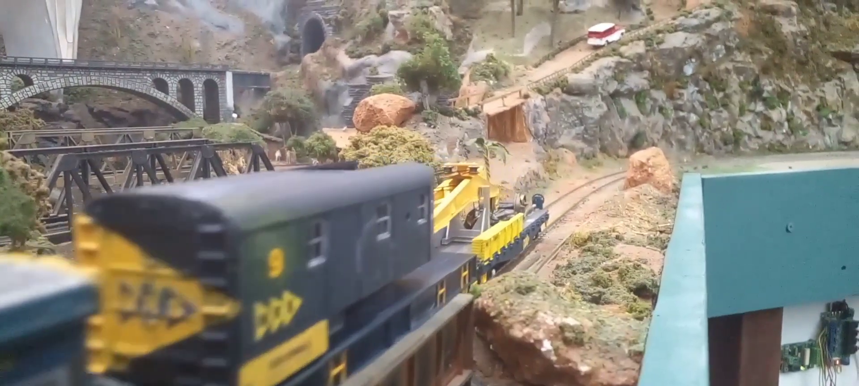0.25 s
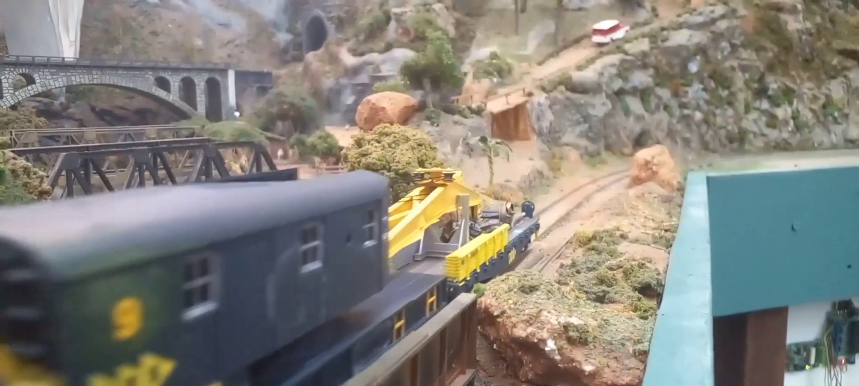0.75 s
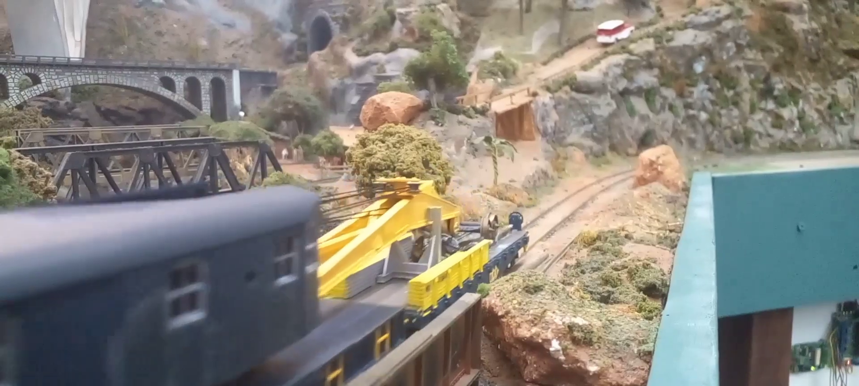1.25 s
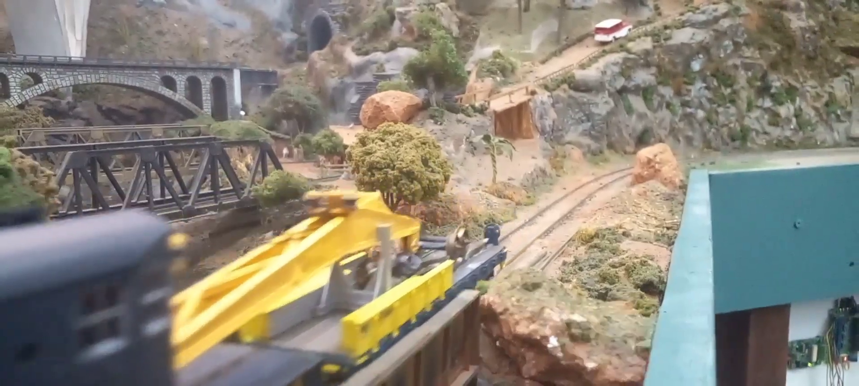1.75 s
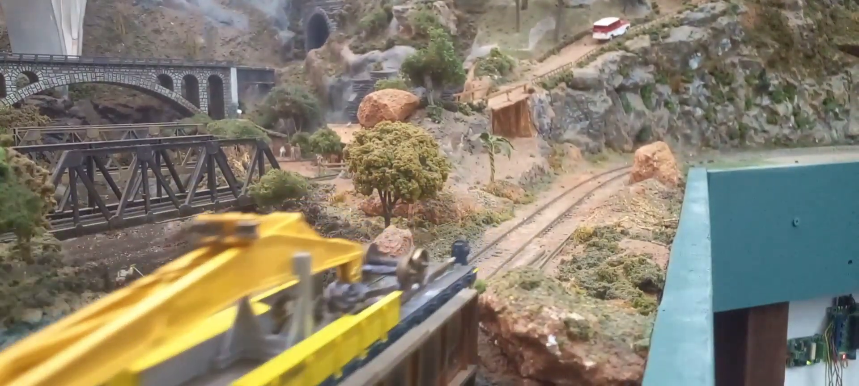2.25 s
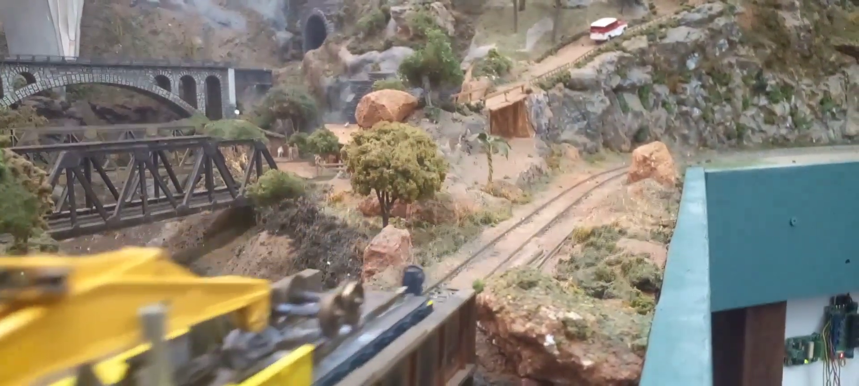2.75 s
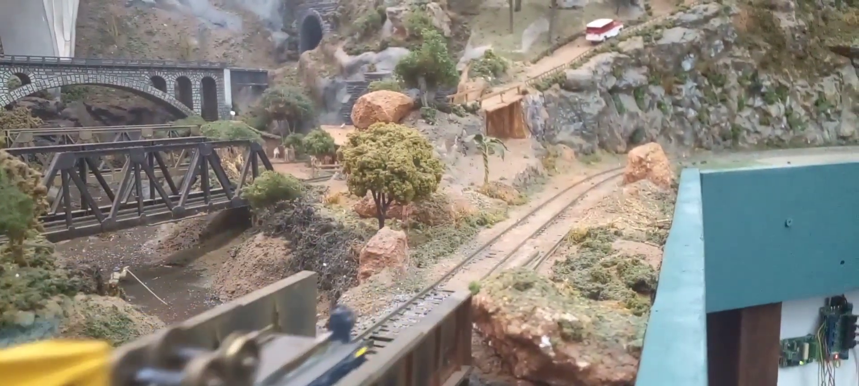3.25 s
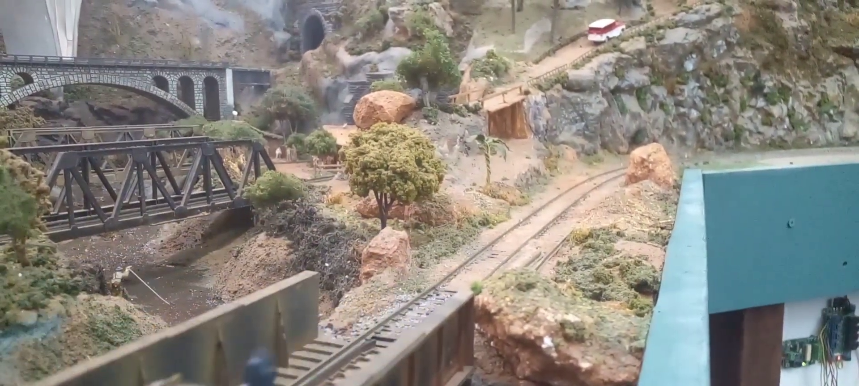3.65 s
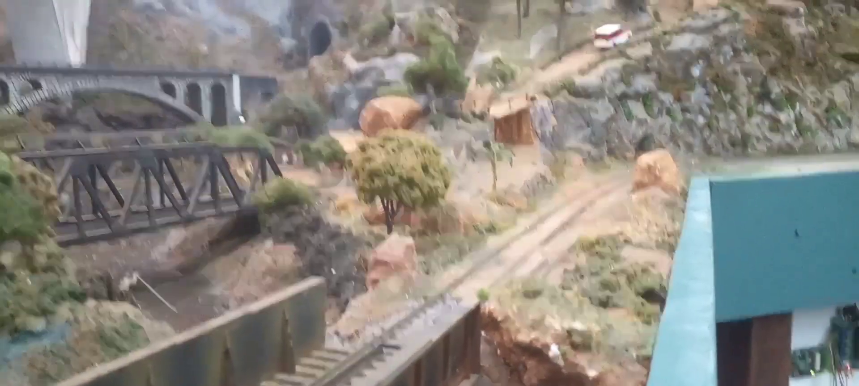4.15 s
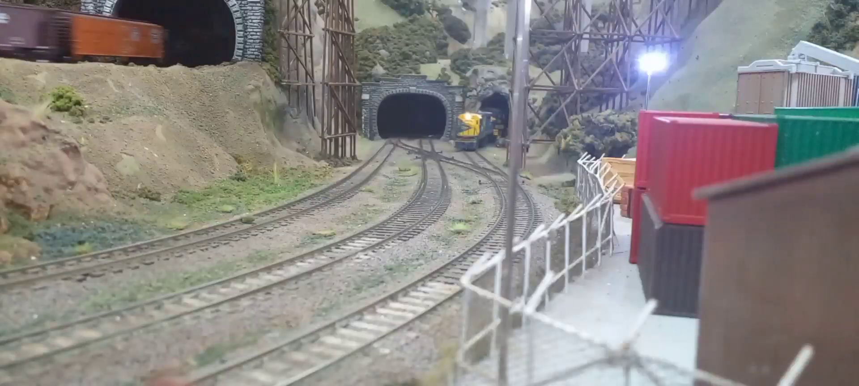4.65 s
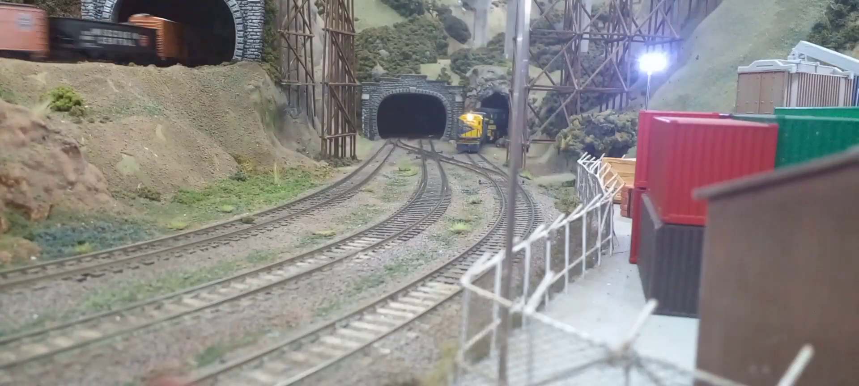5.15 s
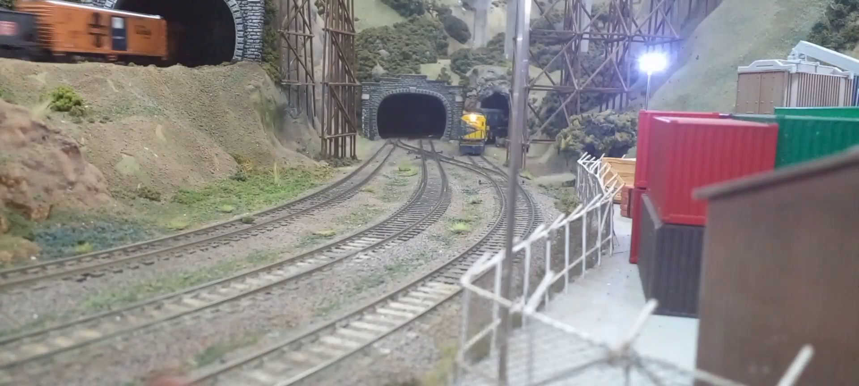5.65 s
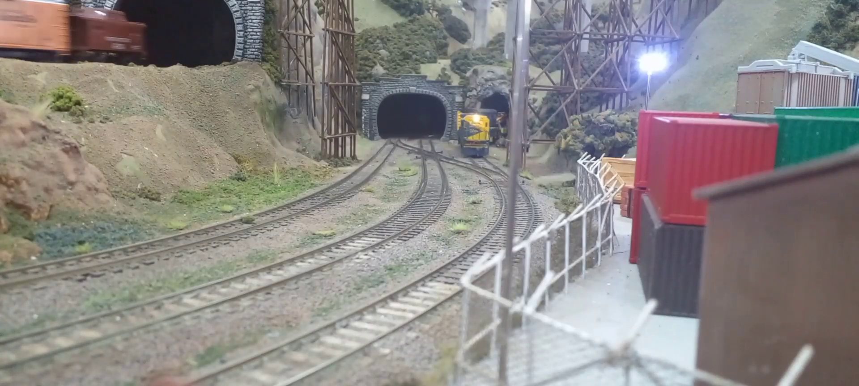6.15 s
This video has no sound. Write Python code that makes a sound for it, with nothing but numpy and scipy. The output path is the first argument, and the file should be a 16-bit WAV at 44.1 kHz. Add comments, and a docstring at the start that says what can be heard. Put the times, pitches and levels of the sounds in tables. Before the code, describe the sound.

Close mono pickup in a small, fairly dry room: tiny wheels hiss and tick on rails above a buzzing electric motor hum and faint mains hum. Clicks begin modest, then turn sharper and sparser while the motor fades. The sound cuts out briefly, then returns abruptly as a fuller, brighter rush of rolling wheels, crowded with muffled clacks, to the end.

```python
"""Motor hum, wheel hiss and clicking wheels of a small electric train drawing away over an indoor bridge;
a short silence; then, close beside a curve, louder rolling with crowded, mostly duller clicks and no motor.
Rolling is shaped noise, motor and mains are wavering sines, clicks are short strikes ringing resonances.
Clicks and knocks leave a short room tail. One mono microphone, the same signal on both channels."""
import sys
import numpy as np
from scipy import signal
from scipy.fft import rfft, irfft, next_fast_len
from scipy.io import wavfile
from scipy.ndimage import uniform_filter1d, map_coordinates

SR = 44100
rng = np.random.default_rng(int(sys.argv[2]) if len(sys.argv) > 2 else 0)


def dump_mix(stems):
    """Bounce the given channels to the path in sys.argv[1] as a 16-bit WAV at rate SR."""
    frames = np.atleast_2d(stems).T  # one column per channel
    limited = np.clip(frames, -1, 1)  # hard clip at full scale
    pcm = np.round(limited * 32767).astype(np.int16)
    wavfile.write(sys.argv[1], SR, pcm)


def ratio(d):
    """dB to gain"""
    e = np.asarray(d, float) / 20
    return 10 ** e


N = 282240

# mains hum: (frequency [Hz], mean level at the bridge [dB rms], mean level at the curve [dB rms])
MAINS_HUM = (59, -56.5, -54)
# spectra of the rolling layers, a list for the bridge and one for the curve:
# (frequency [Hz], relative density [dB per Hz])
RUMBLE_SPECTRA = ([(76, -43.5), (130, -14.5), (210, -3.5), (242, -2.5), (274, -3.5), (349, -5), (425, -8),
                   (452, -10.5), (700, -17), (910, -48.5), (1540, -120)], [(76, -27), (130, 1.5),
                   (200, -3.5), (280, 1.5), (346, 0), (386, -8), (600, -7.5), (780, -34), (1320, -120)])
HISS_SPECTRA = ([(290, -50), (500, -13.5), (589, -4.5), (636, -10.5), (677, -7), (1100, -10), (1170, -8),
                 (1480, -2.5), (2070, -6), (2310, -3), (3200, -18), (4160, -37.5), (7040, -120)],
                 [(240, -23), (400, -12.5), (538, -7.5), (634, -4), (802, -7.5), (963, -3.5), (1200, -5.5),
                 (1970, 0), (3200, -5), (4160, -25), (7040, -120)])
FIZZ_SPECTRA = ([(1650, -28.5), (2800, -8), (3040, -8), (3510, -4.5), (3860, -4.5), (4490, -10), (5110, -9),
                 (5530, -9.5), (6510, -11.5), (7410, -22.5), (7600, -31.5), (9880, -56), (16700, -120)],
                 [(1650, -15.5), (2800, -7), (3200, -1), (3880, -2.5), (4400, -3), (4860, -7.5),
                 (6320, -13), (7600, -31.5), (9880, -64), (16700, -120)])
SHEEN_SPECTRA = ([(4470, -38.5), (7600, -11), (9040, -7), (9780, -6), (11300, -3), (13200, 0.5),
                  (15700, -2)], [(4470, -35), (7600, -18), (8250, -6.5), (10700, 1.5), (13400, -0.5),
                  (15100, -1), (15700, -4)])
# deep thrum of the layout's frame, both places: (frequency [Hz], relative density [dB per Hz])
THRUM_SPECTRUM = [(15, -52.5), (25, -12), (36, -13), (49, -8), (102, 3.5), (126, -1), (150, -10),
                  (200, -35), (330, -120)]
# base levels at the bridge, then at the curve: (thrum [dB], rumble [dB], hiss [dB], fizz [dB], sheen [dB])
LAYER_LEVELS = ((-52, -49, -47, -56, -61.5), (-46, -44, -31.5, -36.5, -57))
# load at each place: (time [s], weight on the frame [dB], wheel rolling [dB]), relative to the base levels
BRIDGE_MOTION = [(0, 3, 0.5), (.2, 2, -1.5), (.55, 2, -0.5), (.7, 7, 0.5), (.95, 5, 1), (1.2, -1, -1.5),
                 (1.5, 1, 1), (1.85, -3, 0.5), (2.1, -4.5, 1), (2.55, -6, 0), (2.72, -4, 3),
                 (2.9, -6.5, -1), (3.3, -4, 1), (3.45, 0, 0.5), (3.7, -8.5, 0), (4.05, 4, 0.5),
                 (4.28, -2, 0)]
CURVE_MOTION = [(4.44, 3, -0.5), (4.6, 2, 0), (5.2, 3, 0.6), (5.75, -0.5, 0), (5.84, -9, 1), (6.05, 0, 0),
                (6.4, -3, 0.3)]
# flange scraping the rail: (time [s], swell [dB], half-length to 1/e of the swell [s])
FLANGE_SCRAPES = [(0.53, 5.5, 0.027), (0.884, 4, 0.023), (0.977, 4, 0.046), (2.09, 2.5, 0.023),
                  (2.9, 4.5, .04), (3.885, 2.5, 0.026)]
# motor shaft: (time [s], speed [turns per s])
SHAFT_SPEED = [(0, 32.6), (.4, 33.3), (.8, 33.9), (1.2, 34.3), (2, 34.6), (4.28, 34.4)]
# motor effort: (time [s], level change of all orders [dB])
MOTOR_EFFORT = [(0, 0), (.4, 0), (.8, -1), (1.1, 0.5), (1.8, 4), (2.2, -0.5), (2.55, -6), (3, 0),
                (3.5, -0.5), (3.9, -7.5), (4.28, -10)]
# shaft orders: (order [cycles per turn], level while near [dB], level once moved on [dB]), before effort
SHAFT_ORDERS = [(3, -64, -69.5), (4, -50.5, -57.5), (5, -61, -62.5), (6, -59.5, -62), (7, -66, -51),
                (8, -50, -68), (9, -61, -62), (10, -69, -67), (11, -66, -64.5)]
# heavy axles on the bridge: (time [s], peak level [dB], frame ring [Hz])
AXLE_THUMPS = [(0.029, -37, 105.3), (.25, -38, 99), (.67, -34, 100), (1.059, -39.5, 118), (1.17, -40, 109),
               (1.479, -41, 101), (4.04, -42, 111), (4.23, -41, 97)]
# wheel clicks on the rail, some with a rattle or bounce as a row of its own:
# (time [s], relative level [dB], loudest ring [Hz], relative brightness [dB])
RAIL_CLICKS = [(0.033, -34, 1440, -9), (0.1847, -36.5, 6500, 3), (0.292, -30.5, 3120, -9.5),
               (0.3786, -28, 3480, -9), (0.393, -26.5, 2660, -3), (0.5139, -28.5, 3060, -4),
               (0.528, -32.5, 2460, -12), (0.6729, -28.5, 1910, -5.5), (0.878, -33.5, 3600, -5),
               (0.9795, -29.5, 1920, -15), (1.3085, -21.5, 5450, 3), (1.611, -26.5, 3900, -2),
               (1.7055, -31, 3170, -10.5), (1.8584, -28.5, 1640, -1.5), (1.987, -18.5, 6530, 8.5),
               (2.0078, -21, 5440, -1.5), (2.07, -34.5, 1440, -2), (2.1746, -18, 6640, 6.5),
               (2.3657, -18.5, 6600, 4), (2.64, -34, 2090, -10), (2.832, -35.5, 3790, 7),
               (2.8404, -29, 1570, -2), (2.886, -27.5, 2050, -19), (2.929, -35.5, 1700, -12),
               (3.0155, -20, 6650, 4), (3.212, -17, 5630, 3), (3.268, -33, 2630, -3),
               (3.2792, -36, 2760, 0), (3.452, -29, 2050, -3), (3.6763, -19.5, 2450, 2.5),
               (3.8514, -17.5, 2500, -7.5), (3.8665, -25.5, 2560, -12), (3.912, -21, 7200, 0.5),
               (4.1046, -34, 1980, -11), (4.519, -23, 3960, -13), (4.598, -17.5, 4200, -14.5),
               (4.707, -22, 2520, -17), (4.785, -20, 4110, -19), (4.861, -20, 1835, -20),
               (5.051, -20, 1940, -15), (5.1513, -22.5, 3960, -12), (5.267, -22.6, 2280, -5.5),
               (5.3494, -25, 2930, -9), (5.441, -21, 3350, -15), (5.733, -21, 3360, -6),
               (5.83, -19.5, 1450, -14), (5.894, -20.5, 3600, -17), (5.914, -25, 1790, -18),
               (6.026, -21, 3170, -13), (6.12, -20, 2950, -12), (6.267, -23, 3510, -18),
               (6.356, -21, 2460, -19)]
# wheel and rail resonances: (frequency [Hz], width [Hz], gain [dB])
RAIL_MODES = [(1473, 380, -0.5), (2415, 370, 1.5), (3747, 390, 0), (4570, 600, -3), (5430, 250, 7.5),
              (6400, 870, 2)]
# baseboard resonances: (frequency [Hz], width [Hz], gain [dB])
BOARD_MODES = [(646, 163, -1), (1270, 280, 0.5)]
# treble of a click: (frequency [Hz], relative density [dB per Hz])
TICK_SPECTRUM = [(7000, -120), (7600, -8.5), (9000, 1), (11000, 7), (13500, 10), (15500, -9), (16500, -18),
                 (16600, -120)]
# clicks grow duller above 7 kHz; this gain shapes the strike that rings the rail: (frequency [Hz], gain [dB])
CLICK_DULLING = [(6900, -5.5), (7900, -13)]
# a coupling knocks on the baseboard: (time [s], relative level [dB])
COUPLING_KNOCKS = [(0.293, -40), (0.309, -33), (0.396, -32), (1.281, -44)]
# room decay: (frequency [Hz], time to fall 60 dB [s])
ROOM_DECAY = [(500, 0.22), (3000, 0.19), (10000, 0.031)]
# pause between the places: (start [s], end [s])
PAUSE = (4.2802, 4.4352)


def unit(x):
    """Scaled to rms 1."""
    return x / np.sqrt(np.mean(x ** 2) + 1e-20)


def peak(x):
    """Scaled to peak 1."""
    return x / np.abs(x).max()


def along(points, hz):
    """Values of (Hz, value) points read on a log frequency axis."""
    f, v = np.transpose(points)
    return np.interp(np.log(hz + 1), np.log(f + 1), v)


def curves(rows):
    """One value per sample for each column after the time."""
    s, *cols = np.transpose(rows)
    return [np.interp(np.arange(N) / SR, s, c) for c in cols]


def wobble(rate):
    """A smooth random curve with rate knots a second."""
    knots = rng.standard_normal(int(N * rate / SR) + 4)
    return map_coordinates(knots, [np.arange(N) * rate / SR])


def filtered(x, response):
    """The sound x through a response given as a function of frequency."""
    m = next_fast_len(len(x) + 4096)
    spectrum = rfft(x, m) * response(np.fft.rfftfreq(m, 1 / SR))
    return irfft(spectrum, m)[:len(x)]


def modes(table):
    """Causal response of a few resonances, alternating in sign."""
    def response(f):
        total = 0
        for k, (centre, width, db) in enumerate(table):
            damping = 1j * f * width
            total = total + (-1) ** k * ratio(db) * damping / (centre * centre - f * f + damping)
        return total
    return response


def rolling(spectrum, patchy_db, grit_db, grit_rate):
    """Noise of rms 1 with patches of gain, roughened by tiny wheel contacts."""
    z = signal.stft(rng.standard_normal(N), nperseg=512)[2]
    field = uniform_filter1d(rng.standard_normal(z.shape), 8, 0)  # smooth across frequency
    field = uniform_filter1d(field, 10, 1)  # and across time
    noise = signal.istft(z * ratio(patchy_db * unit(field)), nperseg=512)[1][:N]
    gritty = noise * ratio(grit_db * wobble(grit_rate))
    return unit(filtered(gritty, lambda hz: ratio(along(spectrum, hz))))


def train(load, place, flutter_db, grit_db):
    """Wheels on rails stir frame and baseboard; a shared random unsteadiness moves hiss, fizz and sheen."""
    weight_db, roll_db = curves(load)
    roll_db = roll_db + scrapes()
    thrum_db, rumble_db, hiss_db, fizz_db, sheen_db = LAYER_LEVELS[place]

    # as the locomotive draws away from the bridge, rumble and sheen sink
    leaving_s = np.arange(N) / SR * (place == 0)
    rumble_db = rumble_db + 0.05 * weight_db - 1.16 * (leaving_s - leaving_s.mean())  # sinks 1.16 dB per s
    sheen_db = sheen_db + roll_db / 2 + np.maximum(-3 * leaving_s, -6)  # 3 dB per s, by 6 dB at most
    flutter = flutter_db * (0.7 * wobble(16) + 0.67 * wobble(45))
    thrum_swell_db = (1.5, 1)[place] * wobble(8)

    thrum = rolling(THRUM_SPECTRUM, patchy_db=1.6, grit_db=1.0, grit_rate=11)
    thrum = thrum * ratio(thrum_db + weight_db + thrum_swell_db)
    rumble = rolling(RUMBLE_SPECTRA[place], patchy_db=0.3, grit_db=0.7, grit_rate=18)
    rumble = rumble * ratio(rumble_db + 1.4 * wobble(11))
    hiss = rolling(HISS_SPECTRA[place], patchy_db=0.85, grit_db=grit_db, grit_rate=320)
    hiss = hiss * ratio(hiss_db + roll_db + flutter / 2)
    fizz = rolling(FIZZ_SPECTRA[place], patchy_db=0.55, grit_db=grit_db, grit_rate=490)
    fizz = fizz * ratio(fizz_db + 0.93 * roll_db + flutter)
    sheen = rolling(SHEEN_SPECTRA[place], patchy_db=0.5, grit_db=grit_db, grit_rate=770)
    sheen = filtered(sheen * ratio(sheen_db + flutter / 2), lambda hz: hz < 15800)
    return thrum + rumble + hiss + fizz + sheen


def motor():
    """Orders of the shaft speed waver in strength and phase; their balance shifts as the locomotive moves on."""
    moves_on_s, move_length_s = 1.26, 0.4  # middle and length of the shift
    angle = 2 * np.pi * np.cumsum(curves(SHAFT_SPEED)[0]) / SR
    moved = np.clip((np.arange(N) / SR - moves_on_s) / move_length_s + 0.5, 0, 1)
    hum = np.zeros(N)
    for order, near_db, far_db in SHAFT_ORDERS:
        level_db = near_db + (far_db - near_db) * moved + 2.3 * wobble(9)
        hum += ratio(level_db) * np.sin(np.round(order) * angle + 0.5 * wobble(9))
    return np.sqrt(2) * ratio(curves(MOTOR_EFFORT)[0]) * hum


def mains(db):
    """The supply's hum, a sine slightly unsteady in level and phase."""
    phase = 2 * np.pi * MAINS_HUM[0] * np.arange(N) / SR + 0.5 * wobble(5)
    return np.sqrt(2) * ratio(db + 2.2 * wobble(5)) * np.sin(phase)


def thumps():
    """Heavy axles push the bridge softly and ring its frame briefly."""
    rise_s, t60_s = 0.012, 0.22
    out, t = np.zeros(N + SR), np.arange(SR // 3) / SR
    envelope = (1 - np.exp(-t / rise_s)) * ratio(-60 * t / t60_s)
    for s, db, hz in AXLE_THUMPS:
        out[round(s * SR):][:len(t)] += ratio(db) * peak(envelope * np.sin(2 * np.pi * hz * t))
    return out[:N]


def all_clicks(faint_count):
    """Every click, in the columns of RAIL_CLICKS: the listed ones, a bounce after each and faint ones."""
    def chance_ring(u):
        """One of the three lowest rail modes, detuned by up to 15 percent."""
        return RAIL_MODES[int(u * 3)][0] * (1 + 0.3 * (u * 3 % 1 - 0.5))

    bounces = []
    for s, db, hz, bright_db in RAIL_CLICKS:
        u, v = rng.random(2)
        later_s = 0.0087 * (1 + 0.2 * (2 * u - 1))
        # a low ring is kept; after a high one chance picks the mode
        ring = hz if hz < 3000 else chance_ring(v)
        bounces.append((s + later_s, db - 9.5, ring, bright_db - 7))  # weaker and duller
    # faint clicks at chance moments before the pause
    faint = [(u * PAUSE[0], -39.5 + 4 * (v - 0.5), chance_ring(w), -6)
             for u, v, w in rng.random((faint_count, 3))]
    return list(RAIL_CLICKS) + bounces + faint


def rattle(t, length):
    """A burst of noise with a very fast rise and a decay of about length seconds."""
    decay = np.exp(-(t / max(length, 0.0005)) ** 1.23)
    return rng.standard_normal(len(t)) * decay * (1 - np.exp(-t / 0.0001))


def wheel_clicks():
    """Each click is a strike and a rattle of a few ms that ring wheel and rail."""
    out, t = np.zeros(N + SR), np.arange(SR // 16) / SR
    for s, db, hz, bright_db in all_clicks(faint_count=12):
        treble_db = -13.5 - 0.37 * bright_db  # relative to the upper modes; shrinks as the click brightens
        length = 0.0034 * ratio(-0.41 * bright_db)  # a duller click rattles longer [s]
        # where the wheel lands favours one mode, which takes the place of its neighbours
        rail = [m for m in RAIL_MODES if abs(m[0] - hz) > 350]
        rail = sorted(rail + [(hz, hz / 16, 9)])
        strike = rattle(t, length) + 2.32 * np.exp(-t / 0.00003)  # a sharp first contact leads the rattle
        strike = filtered(strike, lambda f: ratio(along(CLICK_DULLING, f)))
        lower = peak(filtered(strike, modes([m for m in rail if m[0] < 4300])))
        upper = peak(filtered(strike, modes([m for m in rail if m[0] >= 4300])))
        tick = peak(filtered(rattle(t, length), lambda f: ratio(along(TICK_SPECTRUM, f))))
        click = lower + ratio(bright_db - 2.5) * (upper + ratio(treble_db) * tick)
        out[round(s * SR):][:len(t)] += ratio(db - 2.5) * peak(click)
    return out[:N]


def knocks():
    """A coupling gives the baseboard a soft push with some grit, ringing its resonances."""
    out, t = np.zeros(N + SR), np.arange(SR // 16) / SR
    push = np.sin(np.pi * np.clip(t / 0.00069, 0, 1))
    for s, db in COUPLING_KNOCKS:
        blow = push + 1.1 * rattle(t, 0.0065)
        out[round(s * SR):][:len(t)] += ratio(db + 6) * peak(filtered(blow, modes(BOARD_MODES)))
    return out[:N]


def room(x):
    """The room's answer, 350 samples late: noise in which each frequency dies at its own speed."""
    hz, t, z = signal.stft(rng.standard_normal(SR // 3), SR, nperseg=256)
    decay = ratio(-60 * t / along(ROOM_DECAY, hz)[:, None])
    tail = signal.istft(z * decay, SR, nperseg=256)[1]
    return signal.fftconvolve(np.pad(x, (350, 0)), tail / np.linalg.norm(tail))[:N]


def scrapes():
    """A flange scraping the rail swells the rolling noise: one smooth hump a scrape, in dB."""
    t = np.arange(N) / SR
    return sum(db * np.exp(-((t - s) / length) ** 2) for s, db, length in FLANGE_SCRAPES)


def scene():
    """The bridge, a cut to silence, then the curve; clicks and their room tail belong to both."""
    t = np.arange(N) / SR
    bridge = train(BRIDGE_MOTION, 0, flutter_db=2.0, grit_db=1.0) + motor() + mains(MAINS_HUM[1]) + thumps()
    curve = train(CURVE_MOTION, 1, flutter_db=0.34, grit_db=1.0) + mains(MAINS_HUM[2])
    clicks = wheel_clicks() + knocks()
    clicks = clicks + ratio(-15.5) * room(clicks)
    mono = (bridge + clicks) * (t < PAUSE[0]) + (curve + clicks) * (t > PAUSE[1])
    return np.array([mono, mono])


def low_pass(x):
    """Removes everything above the highest recorded frequency."""
    return signal.sosfilt(signal.butter(12, 16530, fs=SR, output="sos"), x)


def record(dry):
    """The microphone's signal keeps nothing above 16.5 kHz."""
    mix = np.array([filtered(x, lambda hz: hz < 16500) for x in dry])
    return low_pass(mix)


dry = scene()
out = record(dry)
dump_mix(out)
```